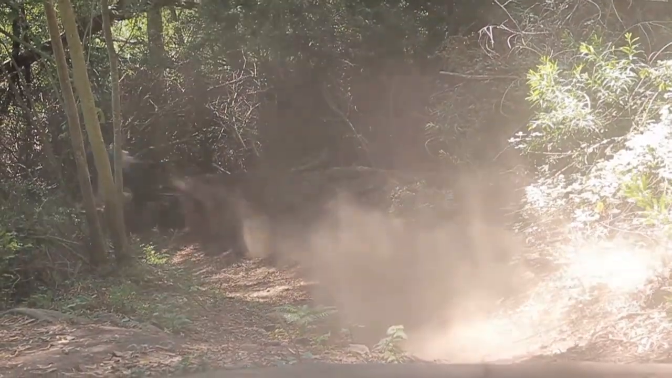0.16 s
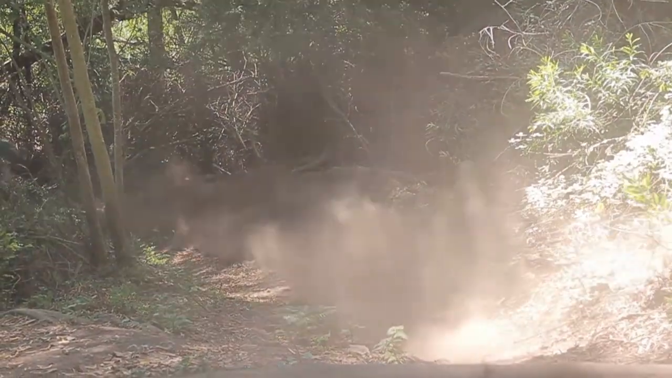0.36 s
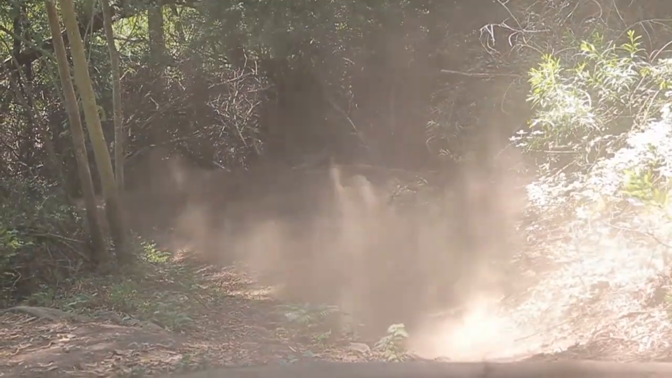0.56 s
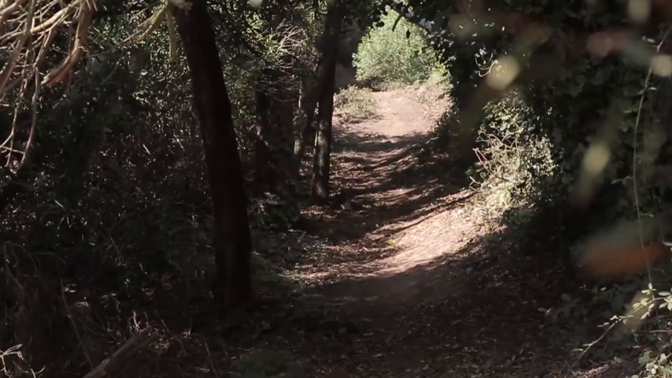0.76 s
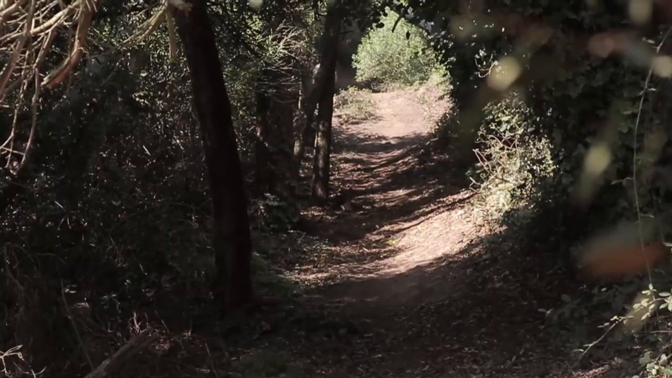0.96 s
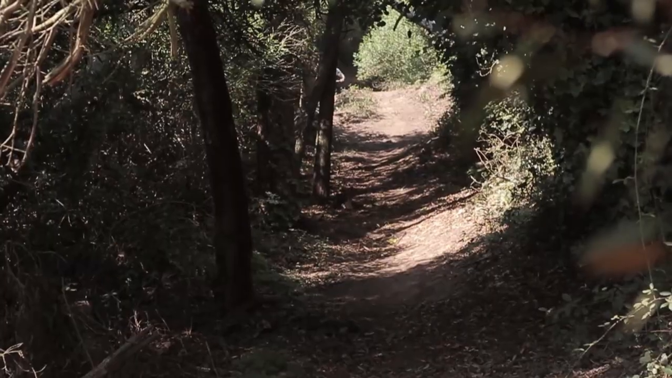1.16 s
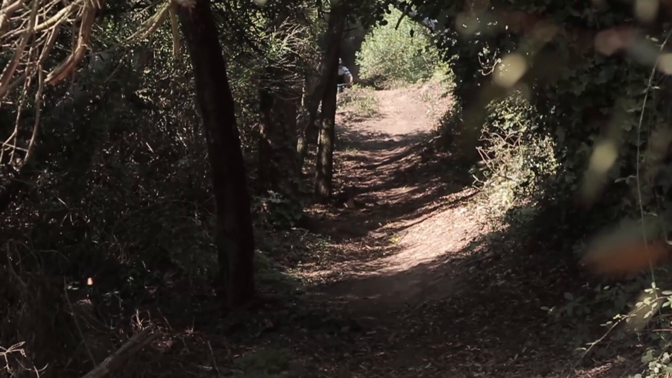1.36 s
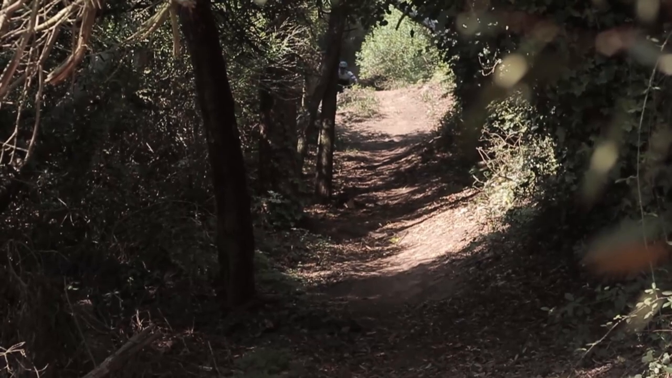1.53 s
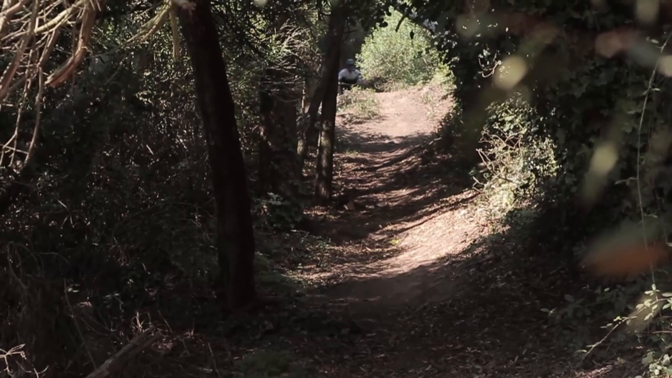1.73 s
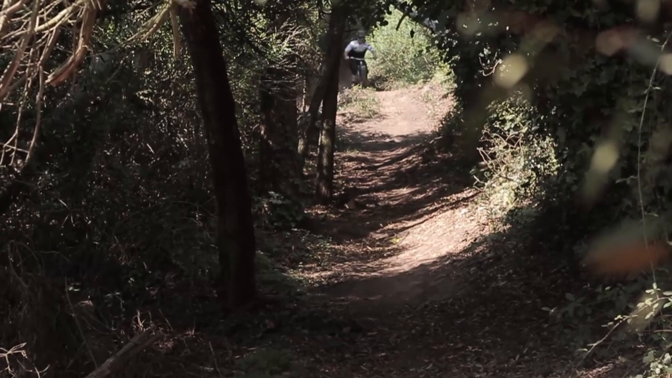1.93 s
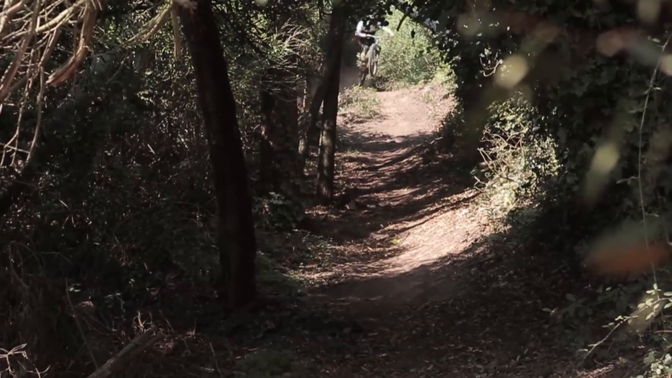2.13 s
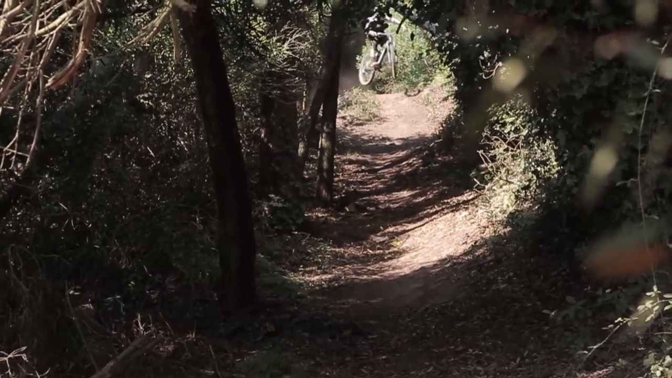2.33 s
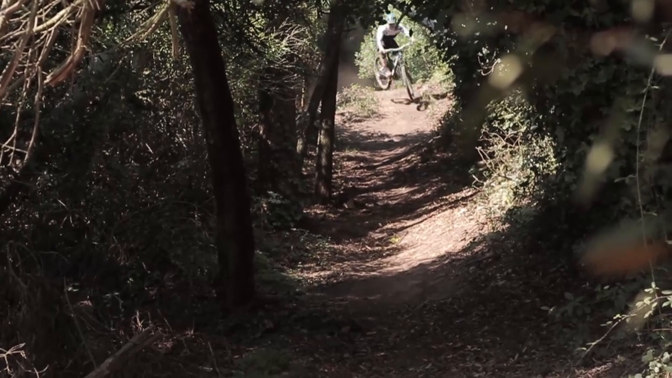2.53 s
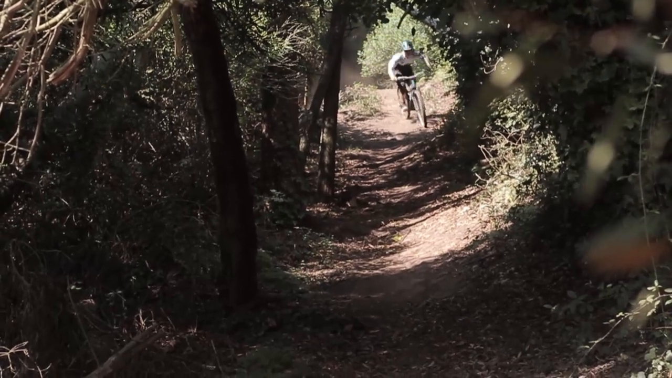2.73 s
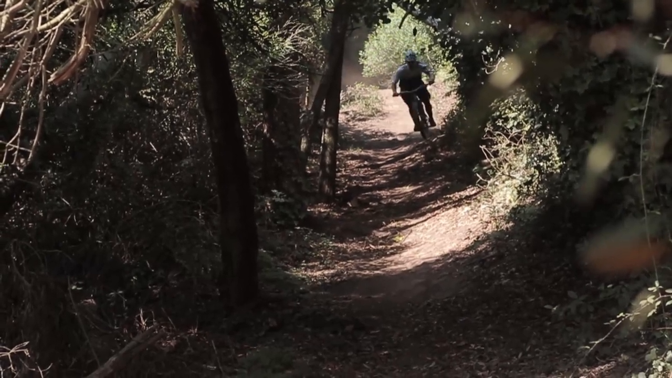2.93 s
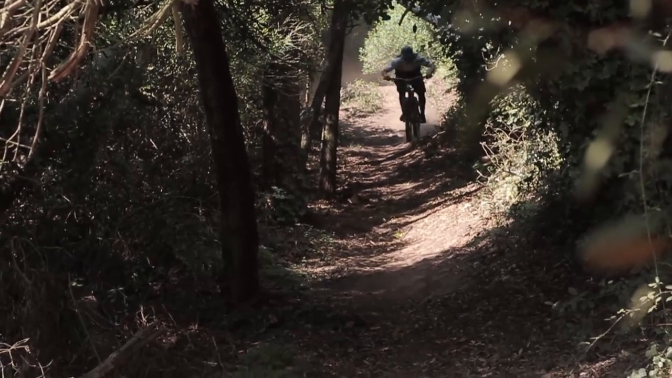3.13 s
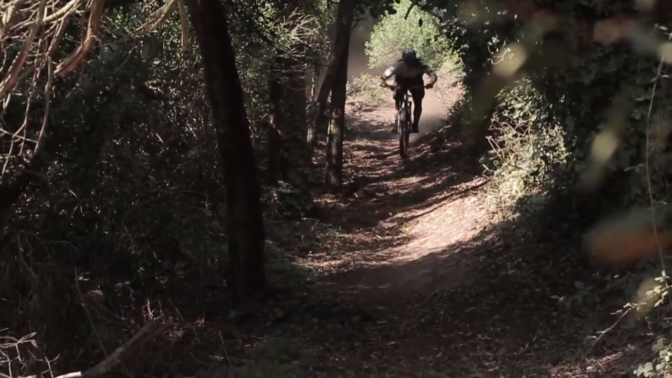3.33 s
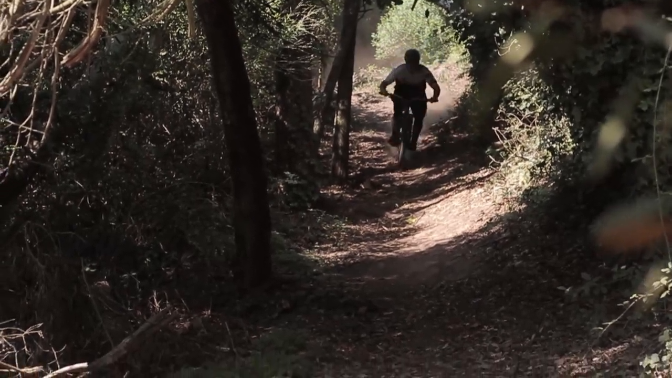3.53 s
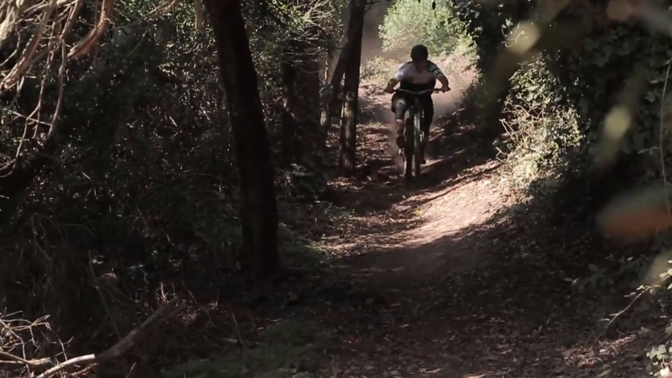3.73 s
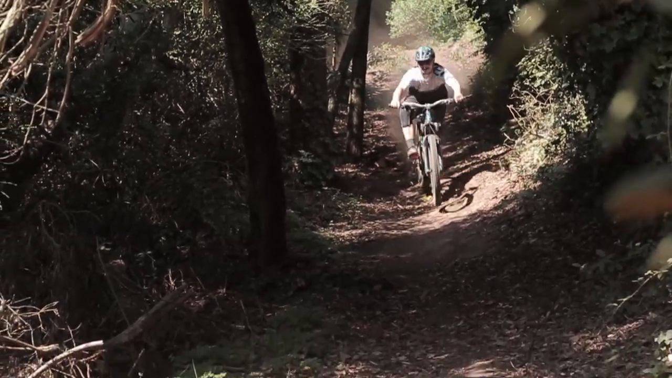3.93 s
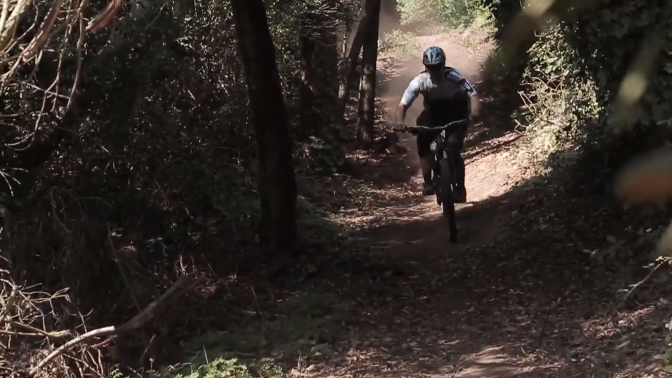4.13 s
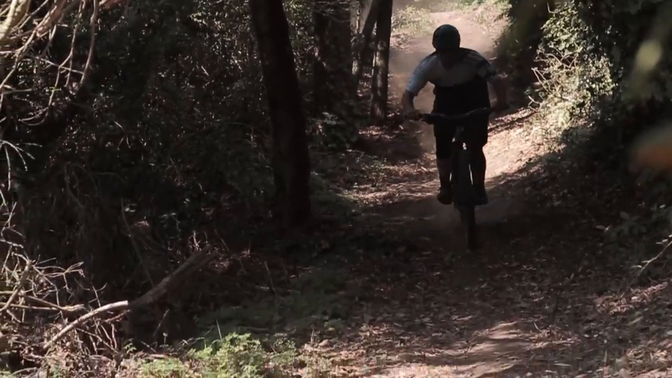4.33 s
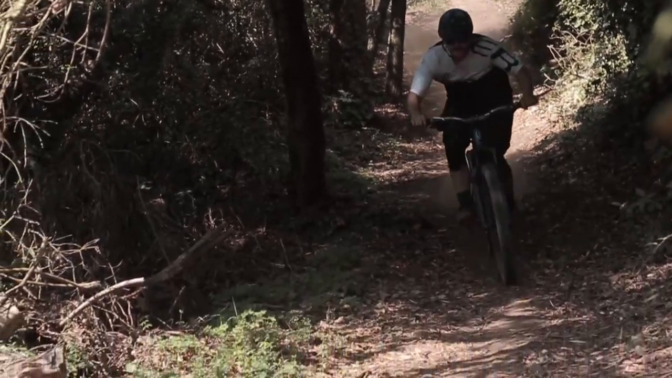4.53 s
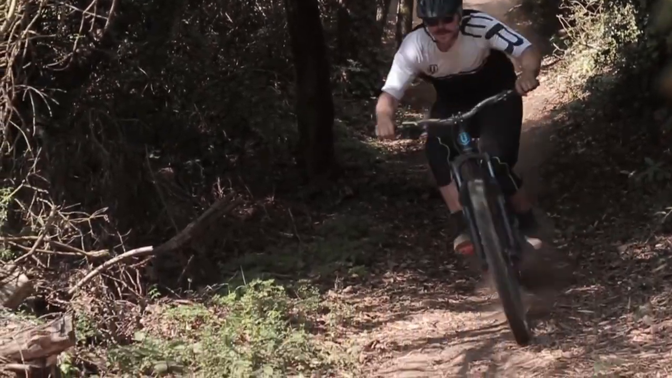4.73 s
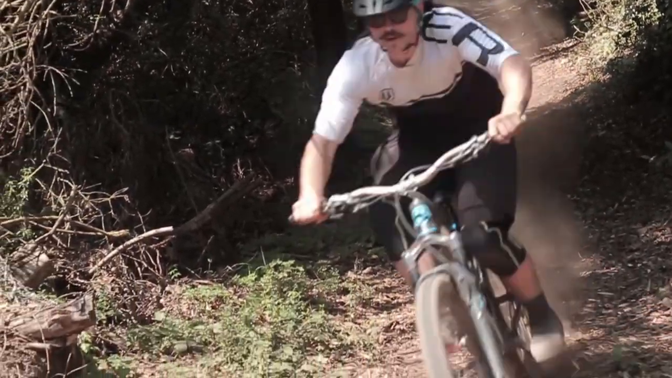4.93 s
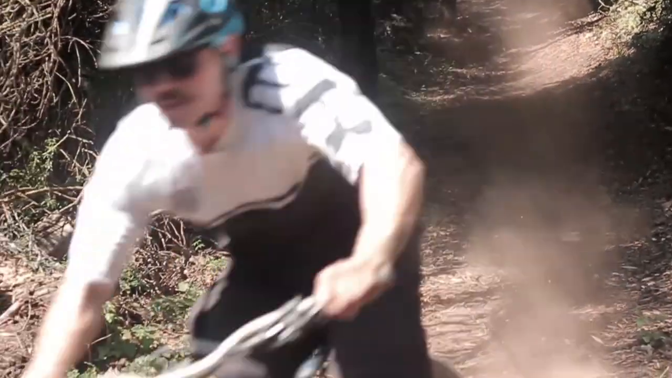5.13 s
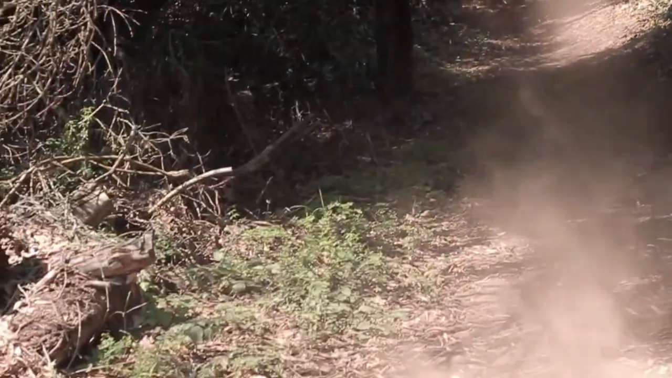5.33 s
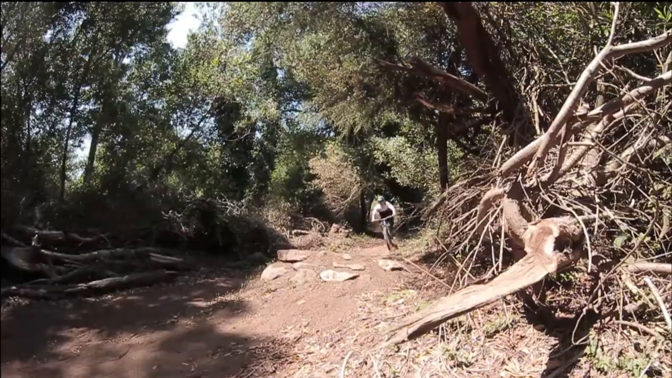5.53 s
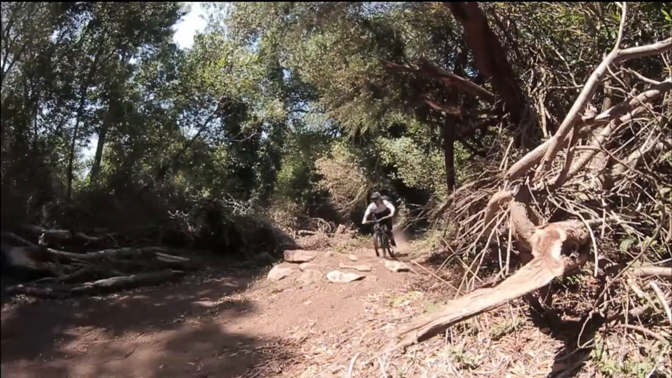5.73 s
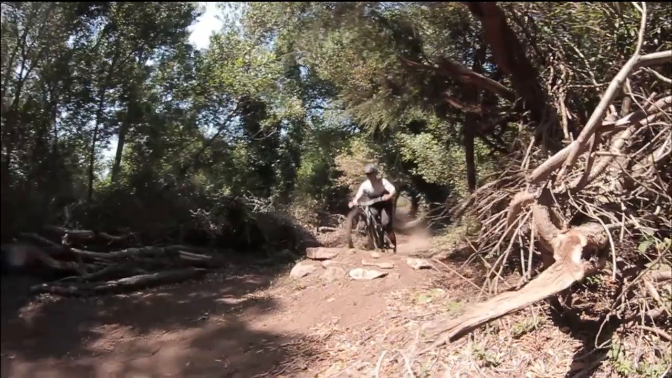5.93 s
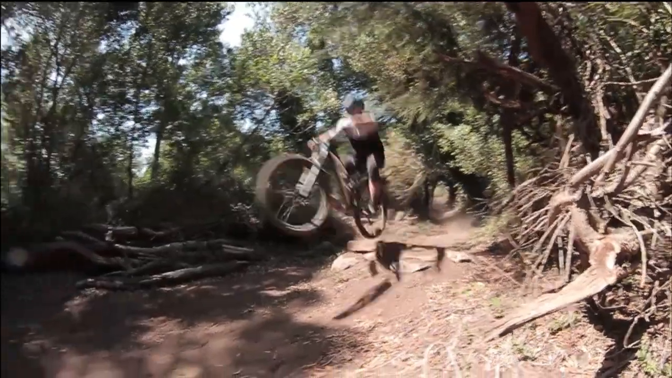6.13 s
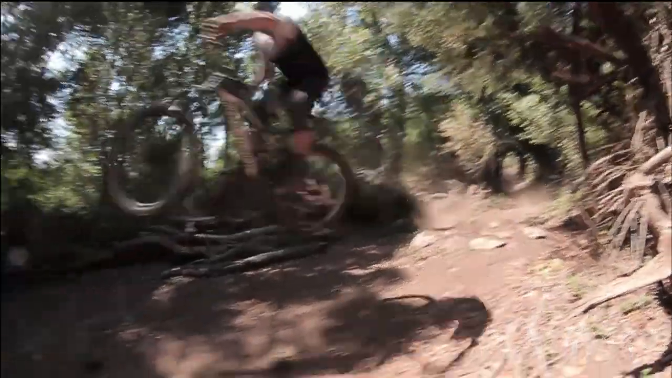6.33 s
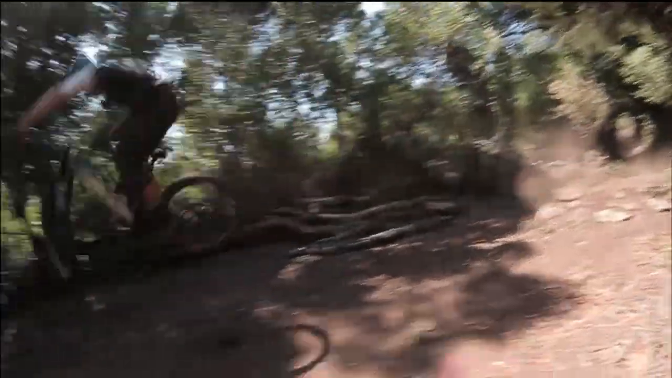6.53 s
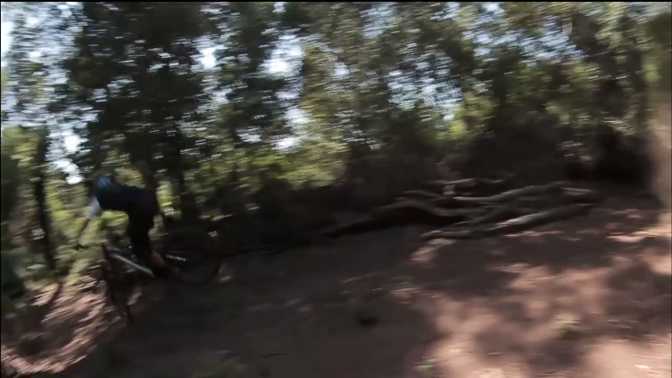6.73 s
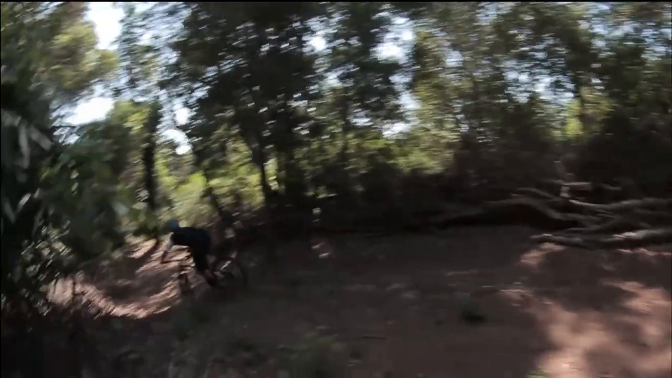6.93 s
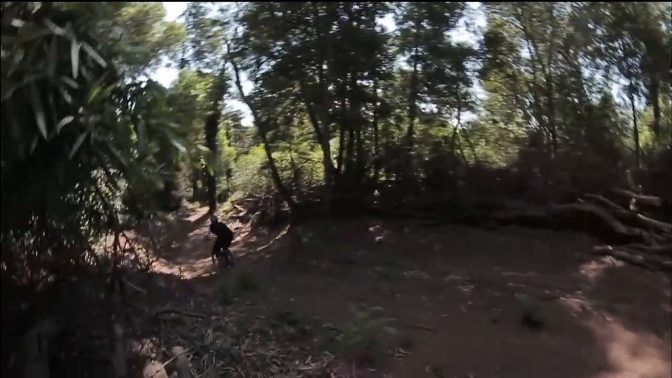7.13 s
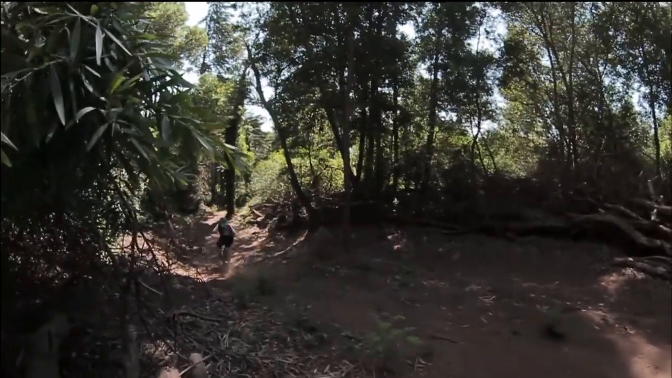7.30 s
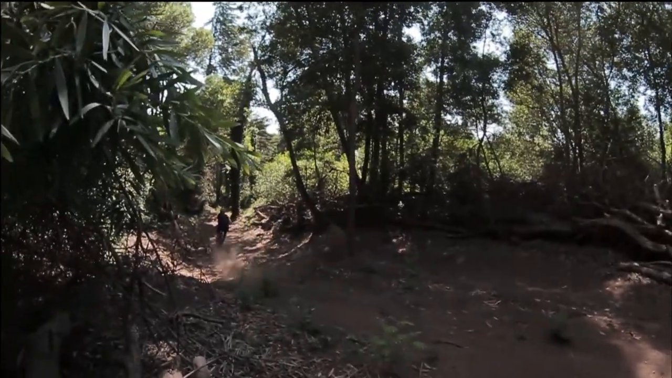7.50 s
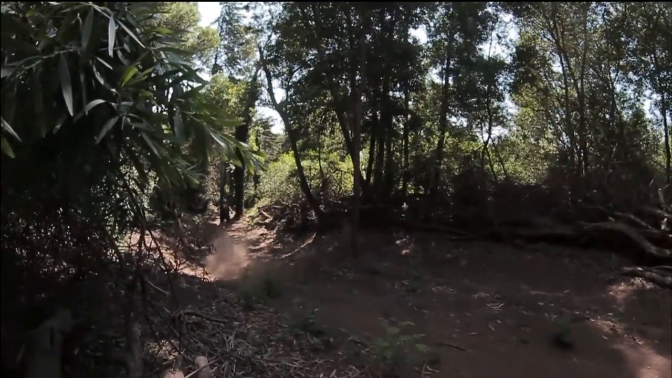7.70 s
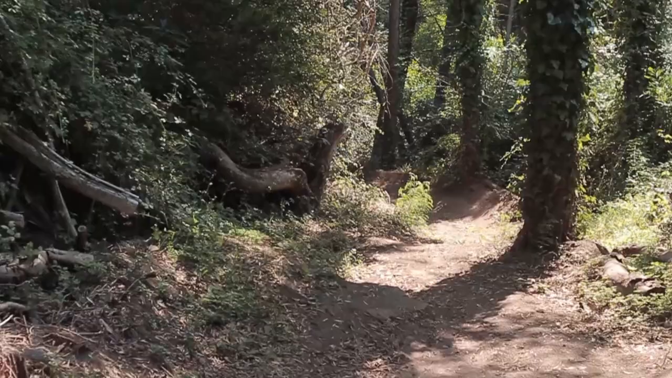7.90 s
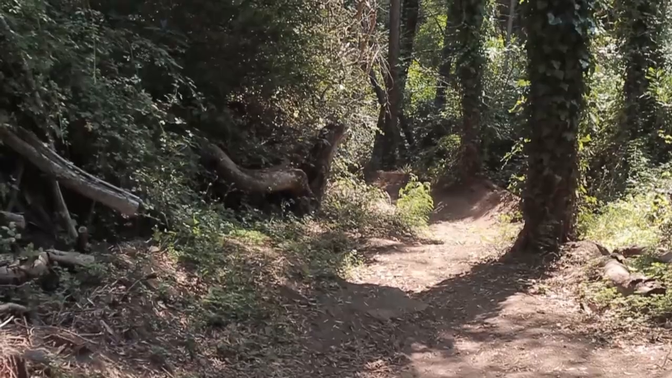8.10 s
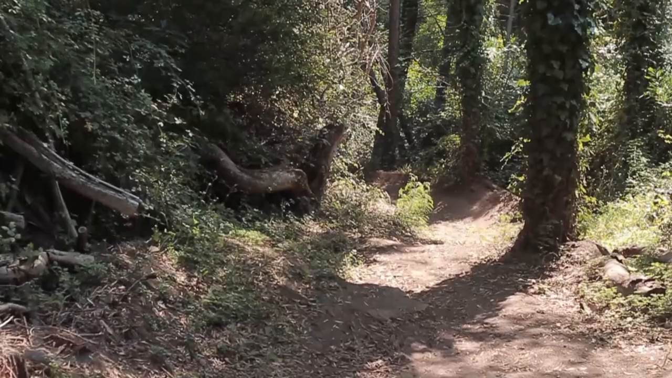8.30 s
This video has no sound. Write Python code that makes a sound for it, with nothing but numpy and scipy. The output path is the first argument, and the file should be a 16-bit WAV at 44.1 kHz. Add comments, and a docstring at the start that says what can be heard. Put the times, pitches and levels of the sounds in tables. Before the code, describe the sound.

Quiet forest air with a faint low rumble. From 0 to 0.8 s, tyres drum and crunch through loose dirt, with small chain rattles and twig snaps, then drop away. Very faint rolling follows from 1.2 to 2.1 s while a songbird begins; its clear, rapid whistled notes are strongest from 1.8 to 2.85 s, echoing among trunks. A distant freehub buzzes briefly around 2.6 s. From 2.9 s tyres approach, crunching, with light knocks and rattles near 4 s, swelling to a very loud, close pass at 5.1-5.5 s full of hard knocks, clatter and sharp snaps. An abrupt cut brings a short run-up and one chirp at 5.6 s. At 6.2-7 s tyres stop, freehub clicks whir and wheels whoosh past. The landing cracks and crunches at 7 s, then rolls away with knocks and sprayed grit. From 8 s to 8.5 s, soft tyres grow, with buzzing freehub and faint hum.

```python
"""A mountain bike on a dusty forest trail, heard from four spots in turn, over still air and a low rumble.
0-2 s: tyres (shaped noise: drum, crunch, grit) roll by, then faintly; a songbird (gliding sines) starts a phrase.
2-5.5 s: the song ends, the far freehub buzzes, tyres near and pass very close; knocks, rattles and snaps peak.
5.5-8 s: one last chirp, a run-up, a jump with freehub clicks and wheel whoosh, a landing near 7 s.
From 8 s: tyres roll at the last spot, the freehub (ringing noise clicks) buzzes over a faint hum."""
import sys
import numpy as np
from scipy import signal
from scipy.fft import rfft, irfft, next_fast_len
from scipy.io import wavfile
from scipy.ndimage import map_coordinates

SR = 44100
rng = np.random.default_rng(int(sys.argv[2]) if len(sys.argv) > 2 else 0)


def persist_wave(psi):
    """Save psi, clipped to +-1, as 16-bit WAV."""
    counts = np.round(np.clip(psi, -1, 1) * 32767).astype(np.int16)
    wavfile.write(sys.argv[1], SR, np.atleast_2d(counts).T)


N = 373086


def amp(db):
    """Decibels to gain."""
    return 10 ** (np.asarray(db) / 20)


def unit(x):
    """Scale to rms 1."""
    return x / np.sqrt(np.mean(x ** 2) + 1e-20)


def clock():
    """Time of every sample, s."""
    return np.arange(N) / SR


def noise(count=N):
    """White Gaussian noise."""
    return rng.standard_normal(count)


def along(points, hz):
    """Interpolate (frequency_hz, value) points on a log axis."""
    point_hz, value = np.transpose(points)
    return np.interp(np.log(hz + 1), np.log(point_hz + 1), value)


def curves(rows):
    """One value per sample for each column after the time."""
    time_s, *columns = np.transpose(rows)
    return [np.interp(clock(), time_s, column) for column in columns]


def gate(start_s, end_s, fade_s):
    """One between two times, with linear fades outside them."""
    inside_s = np.minimum(clock() - start_s, end_s - clock())
    return np.clip(inside_s / fade_s + 1, 0, 1)


def swell(peak_s, spread_s):
    """Gaussian rise and fall, down to 1/e at spread_s from the peak."""
    return np.exp(-((clock() - peak_s) / spread_s) ** 2)


def wobble(knots_per_s):
    """A smooth random curve."""
    knots = noise(int(N * knots_per_s / SR) + 4)
    return map_coordinates(knots, [np.arange(N) * knots_per_s / SR])


def filtered(x, response):
    """x times a response of frequency."""
    size = next_fast_len(len(x) + 8192)
    spectrum = rfft(x, size) * response(np.fft.rfftfreq(size, 1 / SR))
    return irfft(spectrum, size)[:len(x)]


def coloured(x, tone):
    """x shaped by a tone table, at rms 1."""
    return unit(filtered(x, lambda hz: amp(along(tone, hz))))


def resonance(hz, centre_hz, width_hz):
    """A causal resonance with gain 1 at its centre."""
    return 1j * hz * width_hz / (centre_hz ** 2 - hz ** 2 + 1j * hz * width_hz)


def resonant_tone(hz, tone, resonances, boost=1):
    """Gain of a tone table with resonant dB peaks on top."""
    peaks_db = sum(db * abs(resonance(hz, centre, width)) ** 2 for centre, width, db in resonances)
    return amp(along(tone, hz) + boost * peaks_db)


def add(track, start_s, sound):
    """Mix a sound into a track."""
    part = track[round(start_s * SR):][:len(sound)]
    part += sound[:len(part)]


def going_by(nearest_s, level_db, crossing_s):
    """Gain of a straight pass: 15 dB lost per tenfold squared distance through the undergrowth."""
    squared_distance = 1 + ((clock() - nearest_s) / crossing_s) ** 2
    return amp(level_db - 15 * np.log10(squared_distance))


# forest air spectrum: frequency_hz, level_db_per_hz
FOREST_AIR_TONE = [(15, -31), (25, -35), (33, -46), (59, -12), (260, -10), (895, -7.5), (1050, -7.5),
                   (1380, -7.5), (1620, -7), (15500, -21)]
# low rumble spectrum: frequency_hz, level_db_per_hz
LOW_RUMBLE_TONE = [(12, -24), (25, -5.5), (60, -0.5), (110, -2), (170, -15), (600, -74)]
# hum partials: frequency_hz, level_db (rms)
HUM_PARTIALS = [(70, -66), (140, -63)]


def background():
    """Shaped noise for still air and low rumble; sines hum at the last spot."""
    air = amp(-54.5) * coloured(noise(), FOREST_AIR_TONE)
    rumble = amp(-74) * coloured(noise(), LOW_RUMBLE_TONE)
    hum = sum(np.sqrt(2) * amp(db) * np.sin(2 * np.pi * hz * clock()) for hz, db in HUM_PARTIALS)
    return air + rumble + hum * gate(7.98, 9.2, fade_s=0.028)


# forest decay: frequency_hz, t60_s
FOREST_DECAY = [(200, 0.53), (2000, 0.18), (4400, 0.48), (5600, 0.38), (10000, 0.5)]


def forest_echo(x):
    """Trunks scatter sound back as a grainy tail that decays at its own rate per frequency."""
    scatter = noise(SR) * (rng.random(SR) < 0.03)
    hz, t, spectrum = signal.stft(scatter, SR, nperseg=256)
    decay = amp(-60 * t / along(FOREST_DECAY, hz)[:, None])
    tail = signal.istft(spectrum * decay, SR, nperseg=256)[1]
    delayed = np.pad(tail, (round(0.008 * SR), 0))
    return signal.fftconvolve(x, delayed / np.linalg.norm(tail))[:N]


# bird notes, loudest at the turning pitch:
# start_s, rise_s (to turn), fall_s (after turn), start_hz, turn_hz, end_hz, level_db (at turn)
BIRD_NOTES = [(1.2, 0.075, 0.11, 8500, 7950, 7450, -53), (1.35, 0.053, 0.028, 7500, 7220, 7100, -44.5),
              (1.577, .006, .032, 3350, 3370, 2950, -35), (1.61, 0.033, 0.026, 2390, 2520, 2090, -34.5),
              (1.68, .025, 0.038, 2160, 2450, 2100, -42), (1.807, .012, 0.024, 2794, 3945, 3750, -25),
              (1.835, 0.0091, 0.022, 3680, 3550, 3870, -19.5), (1.864, .028, .022, 4150, 4400, 4290, -24),
              (1.968, .012, 0.012, 4350, 4460, 4320, -31.5), (2.038, .011, .009, 3980, 4130, 3730, -33),
              (2.056, 0.017, 0.047, 3700, 4865, 4610, -22.5), (2.269, 0.0063, 0.019, 4314, 4060, 3200, -31),
              (2.29, 0.0068, 0.014, 3680, 4050, 3926, -21.5),
              (2.308, 0.013, 0.018, 3935, 3840, 3640, -19.5), (2.336, 0.0064, 0.013, 3900, 4100, 4150, -23),
              (2.553, .019, .013, 4660, 5320, 5600, -36), (2.568, 0.0187, .007, 3040, 3430, 3600, -31),
              (2.59, .014, 0.022, 3730, 3930, 3510, -19), (2.8, .018, 0.02, 4610, 5250, 5550, -36),
              (2.805, 0.037, 0.018, 2730, 3250, 3250, -37), (2.843, 0.0095, 0.015, 3330, 3550, 4180, -25),
              (3.27, 0.037, 0.1, 4970, 4880, 4800, -52), (3.43, .03, 0.056, 4000, 3850, 3750, -49),
              (5.572, .008, .012, 4380, 5760, 7100, -31)]
# harsh starts of notes: peak_s, level_db
NOTE_RASPS = [(1.81, -47), (2.054, -37), (2.284, -44), (2.568, -37.5), (2.812, -41)]


def bird():
    """Whistled sine glides with pitch flutter; some start with a noise rasp, two carry a higher voice."""
    track = np.zeros(N)
    flutter = 1 + 0.019 * wobble(380)
    tremble = amp(3.4 * wobble(280))
    for start_s, rise_s, fall_s, start_hz, turn_hz, end_hz, level_db in BIRD_NOTES:
        t = np.arange(0, rise_s + fall_s, 1 / SR)
        before = np.clip(1 - t / rise_s, 0, 1)
        after = np.clip((t - rise_s) / fall_s, 0, 1)
        hz = turn_hz + (start_hz - turn_hz) * before ** 1.28 + (end_hz - turn_hz) * after
        phase = 2 * np.pi * np.cumsum(hz * flutter[round(start_s * SR):][:len(t)]) / SR
        edges = np.clip(np.minimum(t, t[-1] - t) / 0.0011, 0, 1)
        second = amp(-46) * np.sin(2 * phase)
        third = amp(-41) * np.sin(3 * phase) * (hz.max() < SR / 6)  # left out of high notes
        level = amp(level_db - 11.5 * before - 9 * after)
        add(track, start_s, np.sqrt(2) * level * edges * (np.sin(phase) + second + third))
    harsh = sum(amp(db) * swell(peak_s, 0.012) for peak_s, db in NOTE_RASPS)
    rasp = coloured(noise(), [(1400, -42), (2900, -4), (4000, 5), (6800, -9.0), (8000, -25)])
    return track * tremble + harsh * rasp


# stirred air spectrum: frequency_hz, level_db_per_hz
WHEEL_AIR_TONE = [(60, -20.5), (250, -9), (450, -2), (950, -2.5), (1400, -1.5), (2200, 0), (5000, -14.5)]
# airborne wheels: nearest_s, level_db (there), crossing_s (to cover the nearest distance)
WHEEL_PASS = (6.485, -30.5, 0.33)


def whoosh():
    """Spinning wheels stir the air in the jump: shaped noise over a weak low rumble."""
    air = coloured(noise(), WHEEL_AIR_TONE)
    low = amp(-33) * coloured(noise(), LOW_RUMBLE_TONE)
    return (air + low) * going_by(*WHEEL_PASS) * gate(6.23, 6.98, fade_s=0.052)


# freehub spectrum: frequency_hz, level_db_per_hz
FREEHUB_TONE = [(500, -16), (1400, 0), (2000, -10), (2550, -0.5), (3700, -2), (4400, -0.5), (4900, 3.5),
                (5600, -0.5), (9600, -2), (10800, -8), (12500, -5.5), (15000, -1.5)]
# hub shell and spoke resonances: centre_hz, width_hz, boost_db
HUB_RESONANCES = [(2550, 200, 2.5), (4630, 500, 2)]


def freehub(ride, pawl_rate, start_s, end_s, t60_s, scatter_db, wash, doppler):
    """Pawls snap over ratchet teeth; noise clicks ring hub and spokes, shifted down by Doppler once past."""
    nearest_s, level_db, crossing_s = ride
    clicks_per_s, = curves(pawl_rate)
    teeth = np.cumsum(clicks_per_s) / SR
    age_s = teeth % 1 / clicks_per_s
    size = amp(scatter_db * noise())[teeth.astype(int)]
    clicks = noise() * (size * amp(-60 * age_s / t60_s) + wash)

    def shifted(ratio):
        return unit(filtered(clicks, lambda hz: resonant_tone(hz / ratio, FREEHUB_TONE, HUB_RESONANCES)))

    gone = 0.5 + 0.5 * np.tanh((clock() - nearest_s) / 0.04)
    buzz = shifted(1 + doppler) * (1 - gone) + shifted(1 - doppler) * gone
    return buzz * going_by(nearest_s, level_db, crossing_s) * gate(start_s, end_s, fade_s=0.22)


# hop far up the trail: loudest_s, level_db (there), swell_s
HOP_PASS = (2.6, -52, 0.18)
# last spot: nearest_s, level_db (there), crossing_s (to cover the nearest distance)
FINAL_PASS = (8.575, -35, 0.24)
# pawls over the jump, first rate held before it: time_s, clicks_per_s
JUMP_PAWLS = [(6.25, 147), (6.286, 112), (6.384, 95), (6.442, 92), (6.608, 162), (6.676, 156), (7.0, 127)]
# pawls gathering speed at the last spot: time_s, clicks_per_s
FINAL_PAWLS = [(8.15, 100), (8.46, 152)]


def far_freehub():
    """The far hub in a hop and at the last spot: clicks blurred by steady noise, no Doppler."""
    hop = freehub(HOP_PASS, JUMP_PAWLS, start_s=2.42, end_s=2.74, t60_s=0.034,
                  scatter_db=0.0, wash=0.6, doppler=0)
    final = freehub(FINAL_PASS, FINAL_PAWLS, start_s=8.1, end_s=8.46, t60_s=0.034,
                    scatter_db=-2.5, wash=0.38, doppler=0)
    return hop + final


# ground reflection: top_s (of the jump), longest_lag_s, width_s (of the lag's rise and fall), strength
GROUND_MIRROR = (6.42, .0027, .35, 0.27)


def over_ground(x):
    """A ground bounce lags most at the top of the jump, so a comb sweeps through the sound."""
    top_s, longest_lag_s, width_s, strength = GROUND_MIRROR
    lag_s = longest_lag_s / np.hypot(1, (clock() - top_s) / width_s)
    bounce = map_coordinates(x, [np.arange(N) - lag_s * SR])
    return (x + strength * bounce) / np.hypot(1, strength)


# coasting bike in the jump: nearest_s, level_db (there), crossing_s (to cover the nearest distance)
FLYING_PASS = (6.637, -24, 0.3)


def jump():
    """Whoosh and freehub of the flying bike, with the ground bounce."""
    hub = freehub(FLYING_PASS, JUMP_PAWLS, start_s=6.3, end_s=7.88, t60_s=0.026,
                  scatter_db=1.0, wash=0.2, doppler=0.025)
    return over_ground(whoosh() + hub)


# twigs snapping, pebbles flung against the bike: start_s, peak_db, centre_hz
TWIG_SNAPS = [(.29, -27, 4500), (.434, -27, 4000), (.686, -17.5, 2740), (3.07, -30, 3000),
              (3.205, -26.5, 2200), (3.79, -25, 5000), (3.96, -32, 3000), (4.165, -24, 6000),
              (5.085, -8.5, 7650), (5.186, -6.5, 11000), (5.401, -5.5, 7000), (7.031, -14, 11000)]


def snaps():
    """Millisecond noise fractures through a broad resonance, with a little debris rustling after."""
    track, t = np.zeros(N), np.arange(SR // 16) / SR
    for start_s, peak_db, centre_hz in TWIG_SNAPS:
        fracture = noise(len(t)) * (amp(-60 * t / 0.0051) + 0.12 * amp(-60 * t / 0.083))
        snap = filtered(fracture, lambda hz: resonance(hz, centre_hz, 0.48 * centre_hz))
        add(track, start_s, amp(peak_db) * snap / np.max(abs(snap)))
    return track


# chain and frame rattle: start_s, peak_db, length_s
CHAIN_RATTLES = [(.076, -26, .04), (0.148, -23.5, 0.047), (2.846, -30.5, 0.026), (3.422, -29.5, 0.013),
                 (3.799, -28.5, 0.013), (3.958, -20, 0.01), (3.99, -25, 0.015), (4.116, -21.5, 0.014),
                 (5.074, -14.5, 0.026), (5.182, -3.5, 0.023), (5.217, -1, .025), (5.314, 3, 0.022),
                 (5.369, -0.5, 0.033), (5.734, -18.5, 0.015), (5.816, -15.5, 0.017), (7.01, -15, 0.025),
                 (7.061, -10, 0.032), (7.142, -21, 0.011), (7.172, -18, 0.041), (7.293, -19, 0.011),
                 (7.769, -21.5, 0.044)]
# slap spectrum: frequency_hz, level_db_per_hz
CHAIN_TONE = [(150, -13), (300, -7), (700, 3.5), (2200, 2), (3000, -5), (5500, -9.5), (15000, -26.5)]


def rattles():
    """Chain and cables slap in noise bursts that swell and die; the frame resonates near 1580 Hz."""
    def frame(hz):
        return (0.65 + resonance(hz, centre_hz=1580, width_hz=1500)) * amp(along(CHAIN_TONE, hz))

    track, t = np.zeros(N), np.arange(SR // 4) / SR
    for start_s, peak_db, length_s in CHAIN_RATTLES:
        u = 3.1 * t / length_s
        burst = filtered(noise(len(t)) * u ** 2 * np.exp(-2 * u), frame)
        add(track, start_s, amp(peak_db) * burst / np.max(abs(burst)))
    return track


# blows of stones and roots: start_s, level_db (before thud and bass cut), centre_hz, t60_s, crack_ratio
HARD_BLOWS = [(3.902, -16, 1215, 0.019, 1), (4.009, -17, 1190, 0.012, 1.4),
              (4.032, -17.5, 1380, 0.032, 3.7), (4.103, -19, 1040, 0.022, 1), (5.142, 12, 747, 0.02, 0.33),
              (5.362, -3, 1280, 0.019, 0.36), (6.997, -10.5, 6440, 0.025, 3.5),
              (7.057, -7.5, 1820, 0.019, 1), (7.202, -12, 1700, 0.029, 0.37),
              (7.632, -8, 1574, 0.034, 0.44)]


def knocks():
    """Blows ring damped frame modes for a few cycles, with a noise crack above and a tyre thud below."""
    track, t = np.zeros(N), np.arange(SR // 8) / SR
    modes = [(0.62, -15), (0.83, -6), (0.98, 6), (1.21, -3)]  # frequency ratio, level_db
    for start_s, level_db, centre_hz, t60_s, crack_ratio in HARD_BLOWS:
        ring = sum(np.sin(2 * np.pi * centre_hz * ratio * t) * amp(db) for ratio, db in modes)
        crack = coloured(noise(len(t)), [(0.21 * centre_hz, -4), (centre_hz, 0),
                                         (3 * centre_hz, -5), (9 * centre_hz, -18)])
        blow = (ring + crack_ratio * crack) * amp(-60 * t / t60_s)
        thud = 0.037 * np.sin(2 * np.pi * 430 * t) * amp(-60 * t / 0.054)
        add(track, start_s, amp(level_db) * (blow / np.max(abs(blow)) + thud))
    return filtered(track, lambda hz: 1j * hz / (1j * hz + 170))  # the blows carry little bass below about 170 Hz


def grains(grains_per_s, spread_db):
    """Random snaps of grit, many small and a few large, at rms 1."""
    size = amp(spread_db * np.minimum(rng.exponential(size=N), 4.5))
    return unit((rng.random(N) < grains_per_s / SR) * size * rng.choice([-1, 1], N))


def ground():
    """Tread contact as clumped noise and impulses: soft lumps, crushed stones, fine spray, larger pebbles."""
    clumps_db = 1.0 * wobble(22) + 1.86 * wobble(130)
    pebbles = grains(45, spread_db=3.0)
    lumps = noise() * amp(0.5 * clumps_db)
    stones = noise() + 0.77 * grains(1800, spread_db=3.0) + 0.3 * pebbles
    spray = noise() + 0.69 * grains(2600, spread_db=3.5) + 0.13 * pebbles
    return lumps, stones * amp(clumps_db), spray * amp(0.72 * clumps_db)


# tyre and rim resonances: centre_hz, width_hz, boost_db (before the stretch's ring factor)
CASING_RESONANCES = [(228, 37, 8), (630, 530, 5.5), (1310, 320, 7.5), (1780, 270, 4)]
# bumps load the tyre, shake the ground: peak_s, drum_db, thud_db, spread_s
TYRE_BUMPS = [(0.101, -32, -53, .02), (0.19, -35.5, -60, 0.033), (2.88, -60, -56, 0.075),
              (3.91, -46, -51, 0.022), (4.88, -46, -56, 0.054), (5.15, -30, -31, 0.015),
              (5.564, -60, -52, .03), (5.825, -52, -48, .018), (6.212, -44, -46, .028),
              (7.03, -50, -47, .045), (7.405, -32, -66, .02)]
# grit thrown by a sliding tyre: peak_s, level_db, spread_s
GRIT_SPRAYS = [(.28, -42, 0.095), (.47, -46.5, 0.083), (.7, -47, 0.096), (2.89, -45.5, 0.041),
               (3.67, -41, 0.042), (4.0, -36.5, 0.046), (4.65, -35.5, 0.17), (5.46, -21.5, 0.055),
               (5.56, -39.5, 0.14), (6.13, -33.5, 0.06), (6.21, -32.5, 0.038), (7.01, -32.5, .04),
               (7.42, -39.5, .06), (7.62, -38.5, .13), (7.87, -37, 0.15)]


def tyres(contact, effort, tone, start_s, end_s, fade_s, ring, crunch_db, drum_db, grit_db):
    """One stretch: low drum, mid crunch and high grit through casing resonances, over ground rumble."""
    lumps, stones, grit, rumble = contact

    def below(hz, edge_hz):
        return 1 / (1 + (hz / edge_hz) ** 8)

    def layer(texture, band):
        def response(hz):
            return resonant_tone(hz, tone, CASING_RESONANCES, ring) * np.sqrt(abs(band(hz)))
        return unit(filtered(texture, response))

    def events(rows):
        return sum(amp(db) * swell(peak_s, spread_s) for peak_s, db, *_, spread_s in rows
                   if start_s < peak_s < end_s + fade_s)

    drum = layer(lumps, lambda hz: below(hz, 436) - below(hz, 93))
    crunch = layer(stones, lambda hz: below(hz, 2750) - below(hz, 452))
    spray = layer(grit, lambda hz: 1 - below(hz, 2800))
    roll_db, = curves(effort)
    # harder rolling drums a further 0.13 dB per dB
    load = amp(roll_db + drum_db + 0.13 * (roll_db - roll_db.max()))
    sound = drum * np.hypot(load, events(TYRE_BUMPS))
    sound += crunch * amp(roll_db + crunch_db)
    sound += spray * np.hypot(amp(roll_db + grit_db), events(GRIT_SPRAYS))
    sound += rumble * load * amp(-20)
    return gate(start_s, end_s, fade_s) * sound


# rolling effort, offset per layer by tyres(): time_s, level_db
BERM_ROLL = [(0.0, -37.5), (0.076, -36), (0.176, -33.5), (0.384, -46), (0.606, -40), (0.652, -48),
             (0.68, -47), (0.794, -63), (0.8, -73)]
DISTANT_ROLL = [(1.1, -70), (1.22, -55), (1.5, -66.5), (1.95, -57.5), (2.08, -55.5), (2.2, -70)]
APPROACH_ROLL = [(2.86, -47), (2.87, -46), (3.134, -43.5), (3.314, -53), (3.662, -37.5), (3.842, -42.5),
                 (3.86, -36.5)]
DESCENT_ROLL = [(3.86, -47), (3.93, -37.5), (4.08, -40), (4.13, -37), (4.36, -36.5), (4.53, -39.5),
                (4.63, -34), (4.83, -34), (5.08, -27)]
CLOSE_ROLL = [(5.06, -28.5), (5.168, -18.5), (5.288, -19.5), (5.346, -16), (5.49, -20)]
RUN_UP_ROLL = [(5.52, -35.5), (5.79, -34), (5.926, -30.5), (6.03, -29), (6.2, -32.5)]
LANDING_ROLL = [(7.0, -26), (7.1, -27.5), (7.26, -29), (7.43, -32), (7.6, -35), (7.72, -37), (7.92, -36),
                (7.96, -43)]
FAR_ROLL = [(8.0, -46.5), (8.03, -51), (8.46, -38.5)]
# tyre spectrum per stretch: frequency_hz, level_db_per_hz
BERM_COLOUR = [(35, -53), (60, -23), (91, -26), (152, -7.5), (285, -2), (464, -15), (572, -7.5), (810, -5),
               (1170, -10.5), (1260, -10.5), (1740, -6.5), (3120, -17.5), (15500, -33)]
APPROACH_COLOUR = [(35, -47), (60, -12), (163, -18), (236, -2.5), (359, -13.5), (559, -3), (931, -8.5),
                   (1100, 0.5), (1290, 1.5), (1520, -7), (1790, -0.5), (2010, -8), (2530, -2.5),
                   (3190, -11), (3670, -9.5), (8280, -17), (15500, -24)]
DESCENT_COLOUR = [(35, -49), (60, -20), (139, -20), (226, 0), (278, -7), (394, -10), (464, -7.5),
                  (559, -0.5), (705, -2.5), (931, -13), (1100, -5.5), (1320, -6), (1630, -10), (2530, -9),
                  (2980, -11.5), (3500, -11), (15500, -23.5)]
CLOSE_COLOUR = [(35, -52), (60, -13), (139, -11), (285, 12), (486, -2.5), (792, 0.5), (889, -3.5),
                (2150, -4.5), (3760, -14.5), (4740, -13.5), (9300, -17), (12000, -21.5), (15500, -20)]
LANDING_COLOUR = [(35, -48), (60, -29), (120, -24), (226, -5.5), (272, -10), (509, -2), (829, -8.5),
                  (1170, -9.5), (1420, -7.5), (2200, -8), (3050, -9.5), (5080, -10.5), (10900, -19.5),
                  (15500, -20)]
FAR_COLOUR = [(94, -44), (160, -14), (258, -12), (458, 0.5), (514, -1), (1260, -4.5), (2080, -10.5),
              (2570, -5), (3170, -11), (4470, -3), (5520, -8), (15500, -19)]
# ground thud spectrum: frequency_hz, level_db_per_hz
GROUND_THUD_TONE = [(12, -20), (28, -1), (55, 0), (90, -7), (170, -4), (600, -74)]


def rolling():
    """Tyres on every stretch plus low thuds at bumps; no rolling while the bike is in the air."""
    contact = (*ground(), coloured(noise(), LOW_RUMBLE_TONE))
    thuds = sum(amp(db) * swell(peak_s, spread_s) for peak_s, _, db, spread_s in TYRE_BUMPS)
    track = coloured(noise(), GROUND_THUD_TONE) * thuds
    track += tyres(contact, BERM_ROLL, BERM_COLOUR, start_s=0, end_s=0.86, fade_s=0.05,
                   ring=0.3, crunch_db=-1, drum_db=-8.5, grit_db=-6.5)
    track += tyres(contact, DISTANT_ROLL, DESCENT_COLOUR, start_s=1.15, end_s=2.15, fade_s=0.06,
                   ring=0.4, crunch_db=-1.5, drum_db=-4.5, grit_db=-5)
    track += tyres(contact, APPROACH_ROLL, APPROACH_COLOUR, start_s=2.86, end_s=3.84, fade_s=0.05,
                   ring=0.15, crunch_db=-0.6, drum_db=-11.5, grit_db=-4)
    track += tyres(contact, DESCENT_ROLL, DESCENT_COLOUR, start_s=3.88, end_s=5.06, fade_s=0.064,
                   ring=0.22, crunch_db=0, drum_db=-6.5, grit_db=-4)
    track += tyres(contact, CLOSE_ROLL, CLOSE_COLOUR, start_s=5.07, end_s=5.5, fade_s=0.0027,
                   ring=0.39, crunch_db=0, drum_db=-9.8, grit_db=-7.0)
    track += tyres(contact, RUN_UP_ROLL, LANDING_COLOUR, start_s=5.51, end_s=6.16, fade_s=0.12,
                   ring=0.11, crunch_db=0, drum_db=-9.0, grit_db=-7.5)
    track += tyres(contact, LANDING_ROLL, LANDING_COLOUR, start_s=6.996, end_s=7.96, fade_s=0.015,
                   ring=0.31, crunch_db=0, drum_db=-7.5, grit_db=-9.0)
    track += tyres(contact, FAR_ROLL, FAR_COLOUR, start_s=7.98, end_s=8.46, fade_s=0.047,
                   ring=0.1, crunch_db=-0.5, drum_db=-8.0, grit_db=-4)
    return track


def scene():
    """Bike and bird among the trees; blows and song also echo."""
    song = bird()
    blows = snaps() + rattles() + knocks()
    bike = far_freehub() + jump() + blows + amp(-19) * forest_echo(blows) + rolling()
    return (background() + song + amp(-5) * forest_echo(song) + bike)[None]


def record(dry):
    """Clip peaks at full scale, then remove everything from 15850 Hz up."""
    return filtered(np.clip(dry[0], -1, 1), lambda hz: hz < 15850)[None]


dry = scene()
out = record(dry)
persist_wave(out)
```